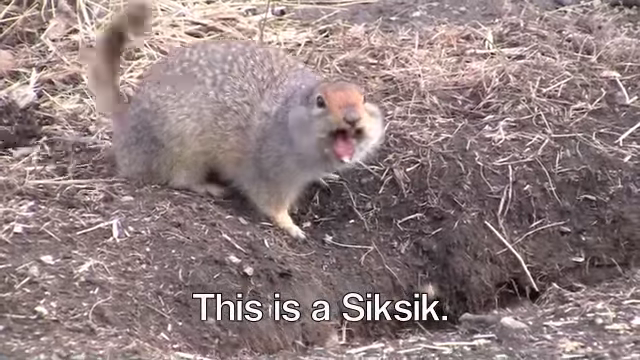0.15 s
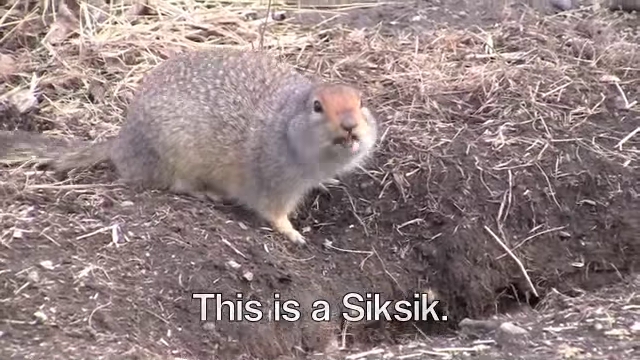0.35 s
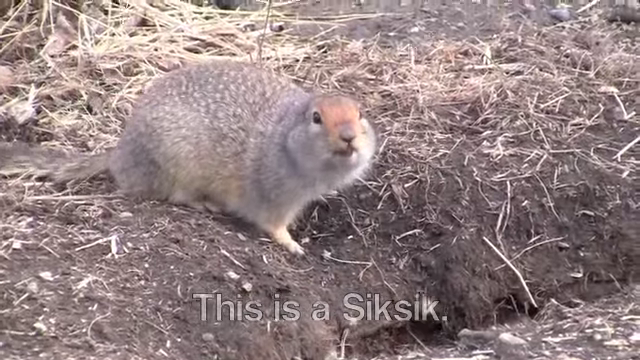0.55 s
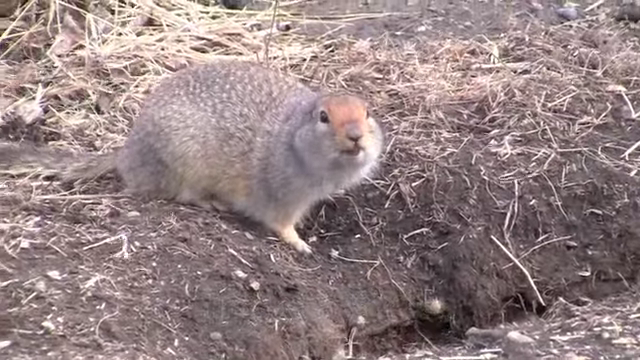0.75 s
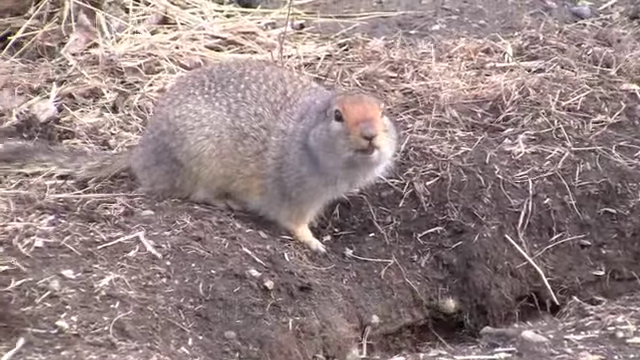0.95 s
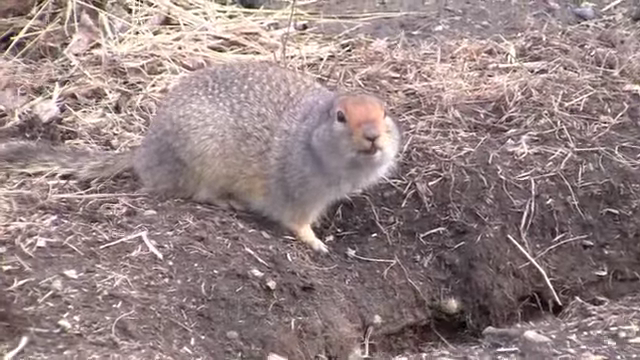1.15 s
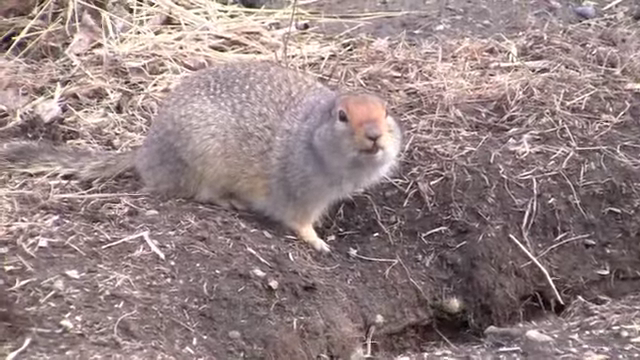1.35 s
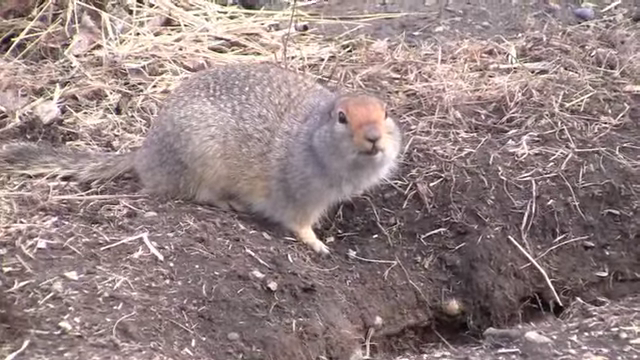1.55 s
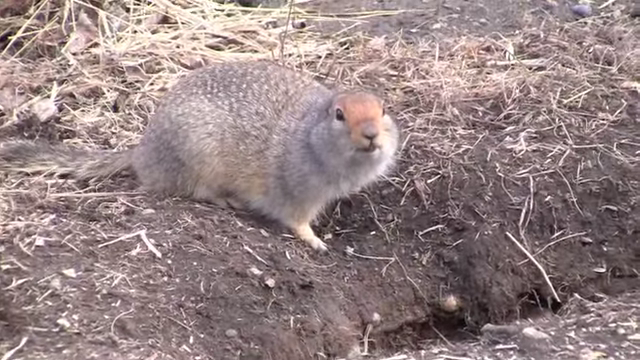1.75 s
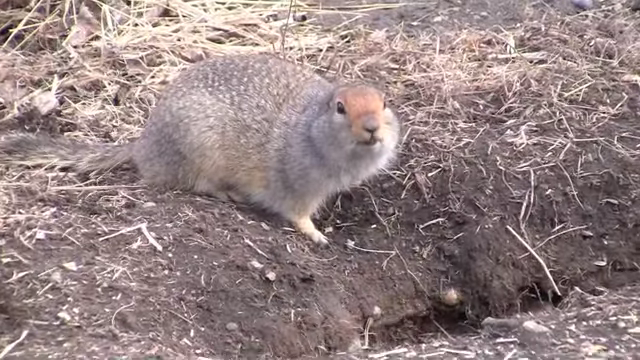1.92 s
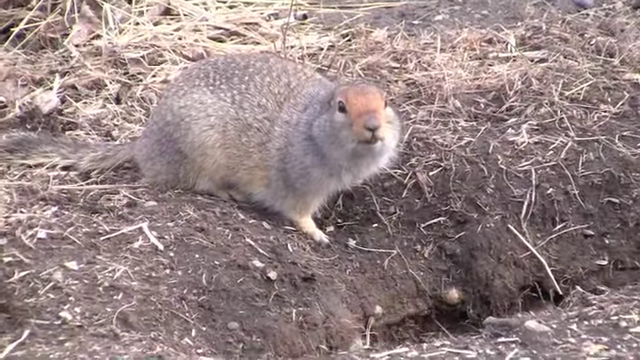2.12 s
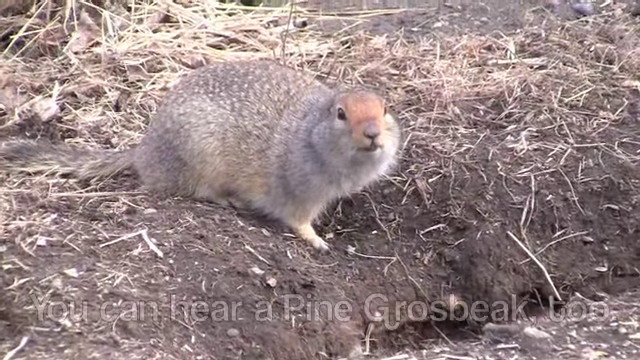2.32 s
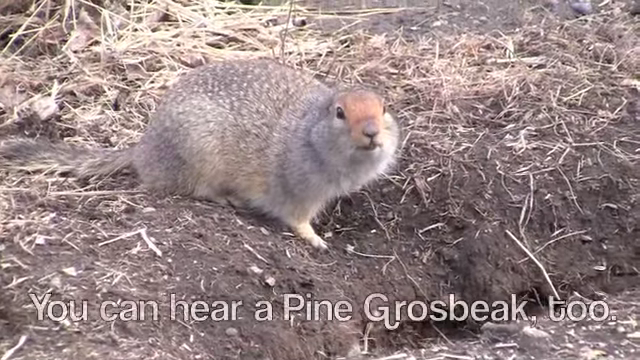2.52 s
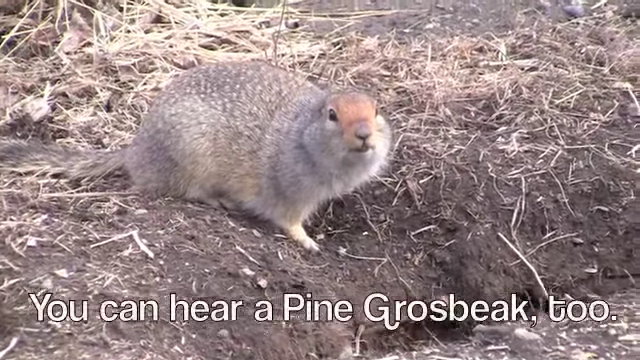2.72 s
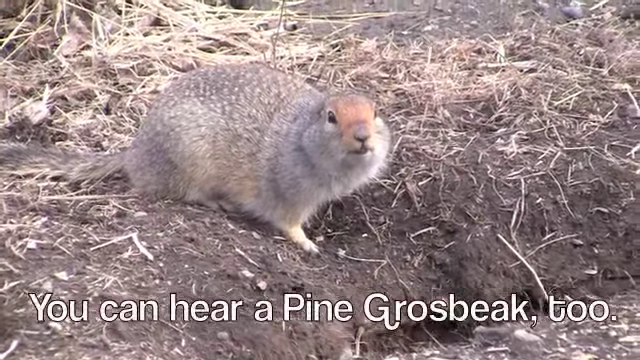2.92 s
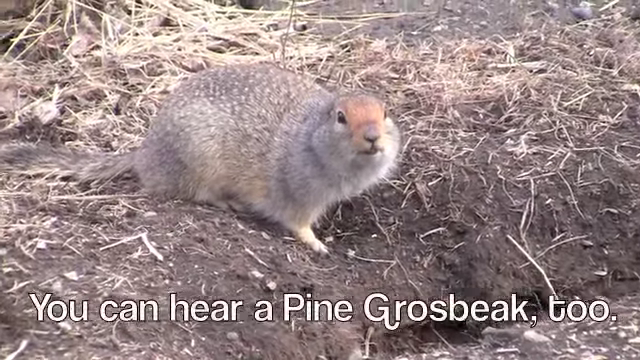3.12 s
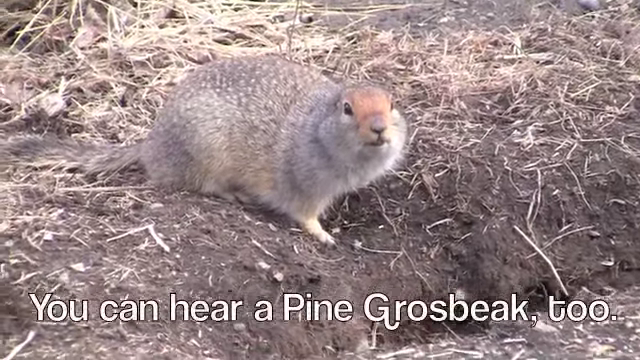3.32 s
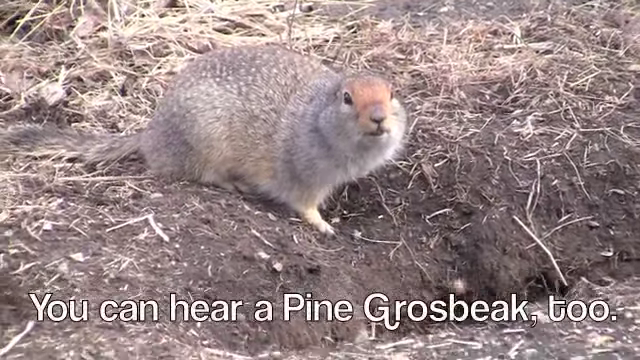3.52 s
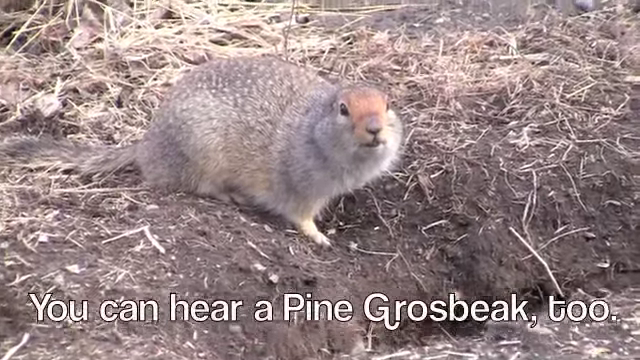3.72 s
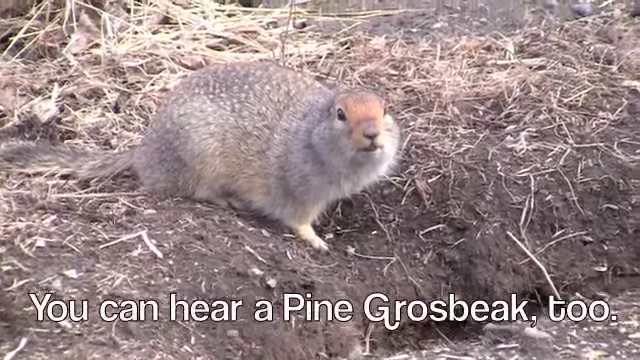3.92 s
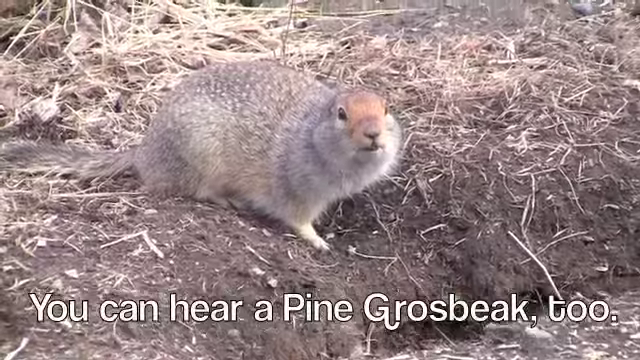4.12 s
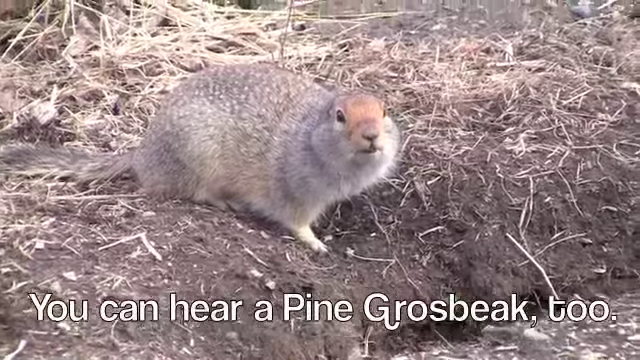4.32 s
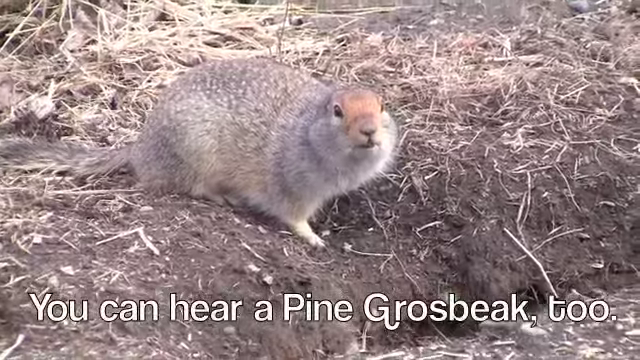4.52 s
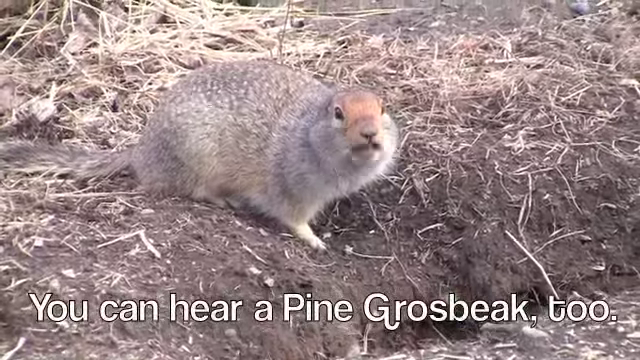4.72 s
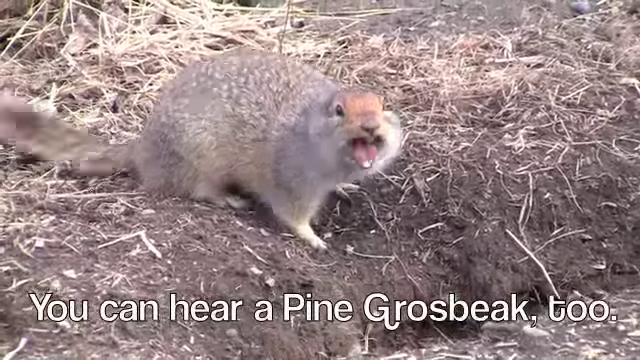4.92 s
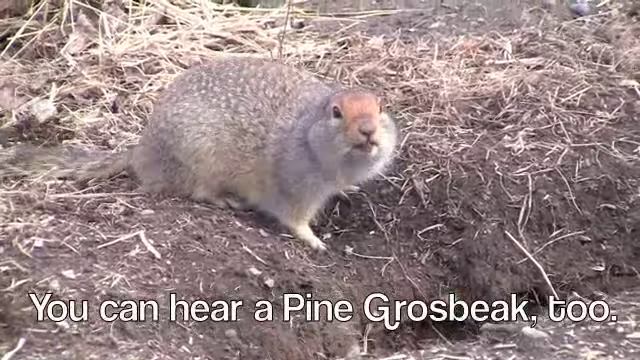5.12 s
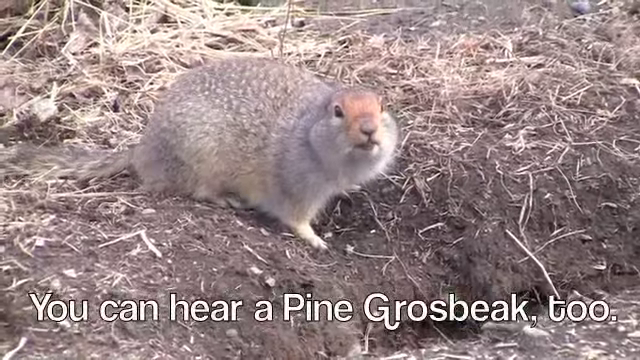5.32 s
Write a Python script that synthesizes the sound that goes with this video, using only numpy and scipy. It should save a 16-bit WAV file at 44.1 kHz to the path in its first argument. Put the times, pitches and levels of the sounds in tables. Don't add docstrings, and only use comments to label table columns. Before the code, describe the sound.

Outdoors on open ground, a ground squirrel fires a loud, shrill double chirp almost at once, long then short, with a brief echo. Low wind thuds bump the small camera microphone in the first second. A quiet gap follows with dry grass ticks and faint finch notes, then a second double chirp near the end.

```python
import sys
import numpy as np
from scipy import signal
from scipy.fft import rfft, irfft
from scipy.io import wavfile
from scipy.ndimage import uniform_filter1d

SR = 44100
rng = np.random.default_rng(int(sys.argv[2]) if len(sys.argv) > 2 else 0)


def voltage_ratio(level):
    return 10 ** (np.asarray(level, float) / 20)


def to_wav(s):
    ch = np.atleast_2d(s).T
    pcm = np.round(np.clip(ch, -1, 1) * 32767)
    wavfile.write(sys.argv[1], SR, pcm.astype(np.int16))


N = 236552


def evened(x):
    return x / np.sqrt(np.mean(abs(x) ** 2) + 1e-20)


def smoothed(x, size):
    return uniform_filter1d(uniform_filter1d(x, size), size)


def read(points, hz):
    f, value = np.transpose(points)
    return np.interp(np.log(hz + 1), np.log(f + 1), value)


def add(mix, s, sound):
    part = mix[..., max(round(s * SR), 0):][..., :sound.shape[-1]]
    part += sound[..., :part.shape[-1]]


def coloured(x, points):
    hz = np.fft.rfftfreq(x.shape[-1], 1 / SR)
    return irfft(rfft(x) * voltage_ratio(read(points, hz)), x.shape[-1])


def echoes(x, start_s, t60, level_db, slope):
    hz, t, z = signal.stft(rng.standard_normal((SR, 2)).T, SR, nperseg=64)
    ring_s = t60 * (5000 / np.maximum(hz, 4000)) ** slope
    tail = signal.istft(z * voltage_ratio(-60 * t / ring_s[:, None]), SR, nperseg=64)[1]
    tail = np.pad(tail / np.linalg.norm(tail[0]), ((0, 0), (round(start_s * SR), 0)))
    return voltage_ratio(level_db) * signal.fftconvolve(x[None], tail, axes=1)[:, :N]


def at_ports(x, balance, phase):
    hz = np.fft.rfftfreq(N, 1 / SR)
    half = voltage_ratio(read(balance, hz) / 2) * np.exp(1j * read(phase, hz) / 2)
    return irfft(rfft(x) * np.array([half, 1 / half]), N)


def distant_wash():
    # frequency in Hz, level in dB per Hz.
    wash_colour = [(88, -18.5), (150, -2), (383, -0.5), (524, -5), (662, -2), (854, -8.5), (979, -8),
                   (2180, -16), (7320, -23.5), (12700, -27), (14800, -30.5), (16000, -34.5)]
    # frequency in Hz, likeness (1 is identical).
    likeness = [(60, 0.13), (180, 0.65), (550, 0.5), (1650, 0.023), (4970, 0.074), (15000, 0.059)]
    # frequency in Hz, left minus right in dB.
    wash_balance = [(60, 2.5), (240, -2.5), (950, -3), (3770, -1.0), (15000, -1)]
    frames, hz = N // 256 + 5, np.fft.rfftfreq(1024, 1 / SR)
    a, b, c, d, patches = rng.standard_normal((frames, 513, 5)).T
    patches = evened(uniform_filter1d(uniform_filter1d(patches, 14, 0), 12, 1))
    same = np.clip(read(likeness, hz), -1, 1)[:, None]
    left = a + 1j * b
    right = same * left + np.sqrt(1 - same ** 2) * (c + 1j * d)
    tilt_db = read(wash_balance, hz)[:, None] / 2
    level_db = read(wash_colour, hz)[:, None] + 1.2 * patches + np.array([tilt_db, -tilt_db])
    wash = signal.istft(np.array([left, right]) * voltage_ratio(level_db), nperseg=1024, noverlap=768)[1][:, :N]
    return voltage_ratio(-52.5 + 2.0) * evened(wash)


def wind_rumble():
    # time in seconds, level in dB.
    wind_level = [(0.0, -51), (0.299, -50), (0.95, -62), (1.5, -59.5), (1.94, -57), (2.2, -67), (2.5, -66),
                  (2.85, -54.5), (3.1, -60.5), (3.8, -61.5), (4.65, -57), (4.87, -62), (5.05, -60),
                  (5.12, -53), (5.36, -56)]
    # frequency in Hz, level in dB per Hz.
    wind_colour = [(20, -10.5), (50, 1), (110, 6.5), (200, -6.5), (400, -28), (800, -40)]
    raw = rng.standard_normal((N, 4)).T
    lumps_db = 5.1 * evened(smoothed(raw[2:], 900))
    rumble = evened(coloured(raw[:2], wind_colour) * voltage_ratio(lumps_db))
    level_db = np.interp(np.arange(N) / SR, *np.transpose(wind_level))
    return rumble * voltage_ratio(level_db + 8.0)


def bumps():
    # start in seconds, peak in dB, pitch in Hz, left minus right in dB.
    eddies = [(0.004, -40.5, 127, -21), (0.022, -40, 135, -6), (0.05, -35, 110, -5),
              (0.065, -30.5, 125, -10), (0.081, -33.5, 244, -15), (0.095, -30, 84, -8),
              (0.113, -24, 151, -7.5), (0.138, -27, 158, -8.5), (0.179, -34, 128, 0), (0.31, -37, 116, -7),
              (0.359, -38, 163, -11), (0.388, -23.5, 168, -10.5), (0.438, -35, 124, -5.5),
              (0.476, -33.5, 153, 4), (0.5, -40, 178, 8.0), (0.859, -22, 165, -13.5),
              (0.887, -39.5, 123, -8), (1.088, -44, 174, 6), (1.569, -38.5, 89, 7), (1.611, -41.5, 120, 11),
              (1.748, -47, 142, 8), (2.048, -32.5, 137, -9), (2.914, -44.5, 121, 14),
              (4.257, -47.5, 78, 21), (4.303, -46, 97, 19), (5.101, -38, 109, 18)]
    out, t = np.zeros((2, N)), np.arange(2600) / SR
    for (s, db, hz, pan), phase in zip(eddies, rng.uniform(0, 2 * np.pi, (len(eddies), 2))):
        u = (t - .013) * hz
        tilt_db = np.array([[pan], [-pan]]) / 2
        cycles = 0.74 * (125 / hz) ** .35
        lead = np.tanh(tilt_db / 3) / 2
        edge = np.cos(2 * np.pi * 1.7 * u + phase[1] + lead) / np.cosh(1.7 * u / cycles)
        edge = voltage_ratio(-10.5 + 0.48 * tilt_db) * edge
        press = (np.cos(2 * np.pi * u + phase[0] + lead) + edge) / np.cosh(u / cycles) ** 2
        add(out, s, voltage_ratio(db + 3.0 + tilt_db) * press * signal.windows.tukey(len(t), .1))
    return out


def ticks():
    # start in seconds, peak in dB, centre in Hz, left minus right in dB.
    snaps = [(.174, -40, 6000, -6), (0.179, -39, 7000, -18), (1.139, -45.5, 8900, -10),
             (1.8317, -37, 4970, -5), (1.954, -39, 6900, -5), (2.057, -43.5, 10900, 12),
             (2.2, -47, 6500, -1.5), (2.319, -43.5, 7000, -6), (2.334, -39, 4400, -5), (2.424, -37, 850, 1),
             (3.782, -44, 4450, -.6), (4.05, -50, 600, -2), (4.8767, -41, 7030, -5),
             (4.8792, -45, 5000, -8)]
    out, t = np.zeros((2, N)), np.arange(400) / SR
    for (s, db, hz, pan), grit in zip(snaps, rng.standard_normal((len(snaps), 400))):
        band = signal.butter(2, [hz / 2.5, min(hz * 1.7, 15000)], "band", fs=SR)
        fade_s = 0.00078 + 2.5 / hz
        snap = signal.lfilter(*band, grit * np.exp(-t / fade_s))
        add(out, s, voltage_ratio(db + np.array([[pan], [-pan]]) / 2) * snap / abs(snap).max())
    return out


def fold(t, crest, arch, db, effort):
    top_hz, rise, fall, flat, tire_db = arch
    missing_db, settle, climb_db, sag_db = effort
    slack = (abs(t - crest) / np.where(t < crest, rise, fall)) ** flat
    settling_db = missing_db * np.exp(-(t - t[0]) / settle)
    slack_db = np.where(t < crest, climb_db * slack ** 2, sag_db * slack)
    level_db = db - settling_db - tire_db * (t - crest) - slack_db
    return top_hz * np.exp(-slack), level_db, slack


def chirp(start, crest, end, low_db, high_db, second):
    # top in Hz, rise in seconds, fall in seconds, flatness of the top, tiring in dB per second.
    low_arch = [(4983, .053, 0.035, 4.4, 40), (4976, .055, .030, 2.8, 127)]
    high_arch = [(7113, .056, .032, 3.6, 89), (7100, .053, 0.024, 2.5, 270)]
    # dB missing at the start, settling in seconds,
    # dB lost while slack on the way up, dB lost on the way down.
    low_effort = (18.2, 0.0047, 7.9, 56)
    high_effort = (25, 0.0083, 16, 120)
    # multiples of the low fold, multiples of the high fold, level against the folds in dB.
    low_turns = [1, 0, 2, 1, 0, 3, 2, 1, 4, -1, 2, -1, 3]
    high_turns = [0, 1, 0, 1, 2, 0, 1, 2, 0, 1, -1, 2, -1]
    mix_db = [0, 0, -3, -7, -16, -27, -24, -26, -28, -22, -26, -18, -32]
    # frequency in Hz, gain in dB.
    mouth = [(1100, -26.5), (2400, -2), (3200, -8), (3900, 9), (4500, 2.5), (9000, -2), (12500, 1.5),
             (15500, 7)]
    # frequency in Hz, level in dB per Hz.
    puff = [(350, -30), (720, -25.5), (1700, -40), (2800, -1.5), (3800, 14), (5500, 0), (7500, 1),
            (10000, 0), (14000, -15)]
    t = np.arange(start, end, 1 / SR)
    low, low_db, slack = fold(t, crest, low_arch[second], low_db, low_effort)
    high, high_db, _ = fold(t, crest, high_arch[second], high_db, high_effort)
    least = .05
    harsh = np.clip((slack - .15) * np.where(t < crest, 2.65, 0.34), least, .7)
    shake = evened(uniform_filter1d(rng.standard_normal((3, len(t))), 24))
    low_turn = 2 * np.pi * np.cumsum(low) / SR + 0.41 * harsh * shake[0]
    high_turn = 2 * np.pi * np.cumsum(high) / SR + 0.27 * harsh * shake[1]
    flutter_db = 2.9 * evened(smoothed(rng.standard_normal((len(mix_db), len(t))), 90))
    voice = np.zeros(len(t))
    for m, n, db in zip(low_turns, high_turns, np.array(mix_db)[:, None] + flutter_db):
        hz = abs(m * low + n * high)
        share = abs(m) / (abs(m) + abs(n))
        spill_db = 22.0 * harsh * (abs(m) + abs(n) > 2)
        level_db = db + spill_db + share * low_db + (1 - share) * high_db + read(mouth, hz)
        voice += np.sqrt(2) * voltage_ratio(level_db) * np.sin(m * low_turn + n * high_turn) * (hz < 18000)
    voice *= 1 + .5 * (harsh - least) * shake[2]
    breath = evened(coloured(rng.standard_normal(len(t)), puff))
    breath *= (harsh - least) ** 1.16 * voltage_ratio(low_db + 3)
    return (voice + breath) * signal.windows.tukey(len(t), .08)


def squirrel():
    # start, crest and end in seconds, low fold level in dB, high fold level in dB.
    chirps = [
        (.1895, .248, .278, -18, -17.5),
        (.283, .318, .339, -20.5, -21),
        (4.882, 4.948, 4.974, -20.5, -22.5),
        (4.981, 5.016, 5.039, -21, -21),
    ]
    # frequency in Hz, left minus right in dB.
    call_balance = [(2200, 0), (3700, 6), (4700, -5.5), (5700, -23), (6900, 2), (8300, -21.5), (10500, -24),
                    (12200, -16), (15000, -2.5)]
    # frequency in Hz, lead of the left port in radians.
    call_phase = [(2200, 1.7), (3500, -1.4), (4800, -0.9), (5700, -5.5), (6500, 1.5), (9800, -2.64),
                  (11500, -3.9), (14000, -18.5)]
    calls = np.zeros(N)
    for k, row in enumerate(chirps):
        add(calls, row[0], chirp(*row, second=k % 2))
    calls *= voltage_ratio(7.0)
    ground = echoes(calls, .0006, .04, -4.5, .05)
    scrub = echoes(calls, .004, .15, -10, .15)
    far_slope = echoes(calls, 0.022, 0.53, -26, 0.22)
    return at_ports(calls, call_balance, call_phase) + ground + scrub + far_slope


def finch():
    # start in seconds, length in seconds, crest in Hz, end in Hz, level in dB.
    hooks = [(2.396, 0.052, 3790, 3190, -50), (2.537, 0.014, 3300, 3000, -54.5),
             (2.578, 0.045, 4620, 3660, -50.5), (2.613, 0.0254, 4220, 4050, -51.5),
             (4.063, 0.046, 3575, 3570, -45.5), (4.206, 0.0447, 3350, 3130, -45.5),
             (4.445, 0.039, 3320, 3300, -55)]
    # start in seconds, length in seconds, from Hz, to Hz, level in dB.
    slides = [(0.447, 0.039, 2810, 3480, -56.5), (2.525, 0.013, 3400, 3830, -60),
              (2.547, .016, 2890, 1960, -56), (4.201, .017, 2380, 4260, -51),
              (4.325, 0.031, 3410, 3325, -53.5), (4.416, .02, 2970, 2980, -60),
              (4.435, 0.022, 2465, 4090, -54), (4.5, 0.048, 3680, 3170, -66)]
    # from seconds, then second, third and fourth harmonic in dB.
    phrase_overtones = [(0.1, -20, -20, -25), (2.3, 1, -0.5, -20), (2.57, -11.5, -10, -28),
                        (3.9, -17, -9, -22), (4.49, -19.5, -24, -30)]
    # frequency in Hz, gain in dB.
    beak = [(2000, -1), (2700, 0), (5300, 0.5), (6200, -13), (7000, 2.8), (11300, -4), (12500, -17),
            (15000, -4)]
    # frequency in Hz, left minus right in dB.
    finch_balance = [(3400, -7.5), (7200, -5.5), (10300, -22)]
    # frequency in Hz, lead of the left port in radians.
    finch_phase = [(3400, 0.92), (7200, 2.2), (10300, -1.9)]
    song, phrases = np.zeros(N), np.array(phrase_overtones)
    for hooked, (s, length, first_hz, end_hz, db) in [(1, row) for row in hooks] + [(0, row) for row in slides]:
        u = np.arange(0, length, 1 / SR) / length
        hz, level_db = first_hz + (end_hz - first_hz) * u, db + 0 * u
        if hooked:
            hz = np.interp(u, [0, 0.36, .75], [first_hz * (1 - 0.133), first_hz, end_hz])
            level_db = db + np.interp(u, [0, 0.36, 1], [-15.5, 0, -11])
        warble_db = 3 * evened(smoothed(rng.standard_normal(len(u)), 130))
        turn = 2 * np.pi * np.cumsum(uniform_filter1d(hz, 120)) / SR
        note = np.sin(turn)
        for k, over_db in enumerate(phrases[phrases[:, 0] < s][-1, 1:]):
            note += voltage_ratio(over_db) * np.sin((k + 2) * turn)
        add(song, s, voltage_ratio(level_db + warble_db + 2.0) * note * signal.windows.tukey(len(u), .3))
    song = coloured(song, beak)
    return at_ports(song, finch_balance, finch_phase) + echoes(song, .006, .3, -11, 1.2)


def far_whistle():
    # time in seconds, level in dB.
    whistle_level = [(3.1, -76), (3.55, -72), (3.7, -53.5), (4.05, -59), (4.4, -61), (4.6, -57),
                     (4.85, -67)]
    s, db = np.transpose(whistle_level)
    blur = smoothed(rng.standard_normal((5, N)), 160)
    hz = 3050 + 42.2 * evened(uniform_filter1d(blur[4], 6000))
    whistle = evened(blur[:2] + 1j * blur[2:4]) * np.exp(2j * np.pi * np.cumsum(hz) / SR)
    return whistle.real * voltage_ratio(np.interp(np.arange(N) / SR, s, db, -99, -99) - 12.5)


def scene():
    return distant_wash() + wind_rumble() + bumps() + ticks() + squirrel() + finch() + far_whistle()


def low_pass(x):
    return signal.sosfilt(signal.butter(12, 16340, fs=SR, output="sos"), x)


def record(dry):
    power_db = 10 * np.log10(abs(uniform_filter1d((dry ** 2).mean(0), 300, origin=149)) + 1e-12)
    fall_db = np.arange(N) * 70. / SR
    held_db = np.maximum.accumulate(power_db + fall_db) - fall_db
    over_db = np.maximum(held_db + 21, 0)
    ducked = dry / voltage_ratio(.65 * uniform_filter1d(over_db, 200))
    edge = signal.firwin(255, 15920, window=("kaiser", 8), fs=SR)
    return low_pass(signal.oaconvolve(ducked, edge[None], "same"))


dry = scene()
out = record(dry)
to_wav(out)
```